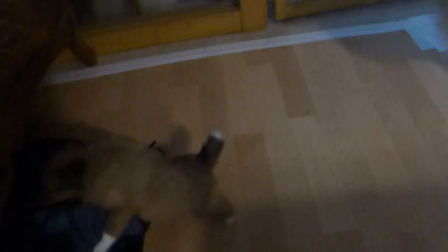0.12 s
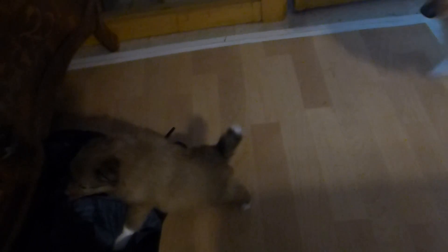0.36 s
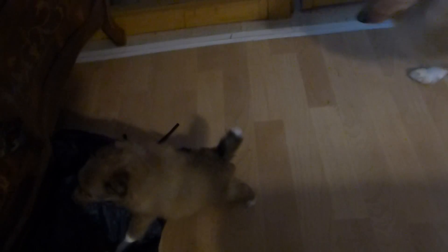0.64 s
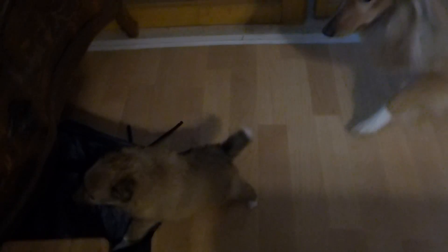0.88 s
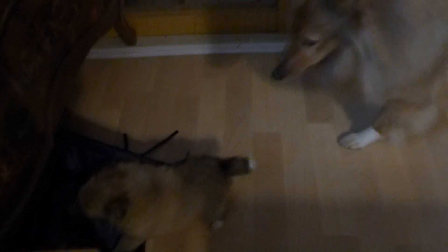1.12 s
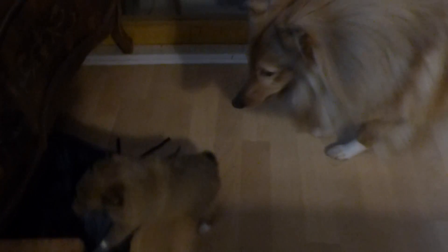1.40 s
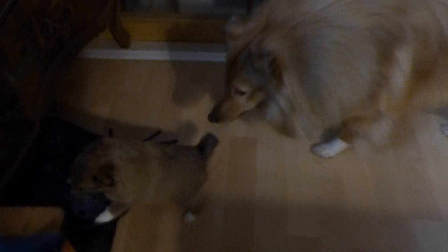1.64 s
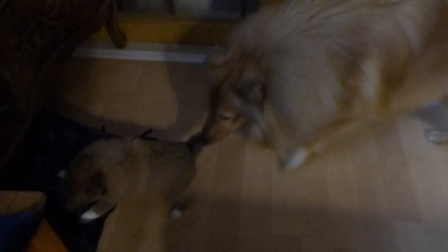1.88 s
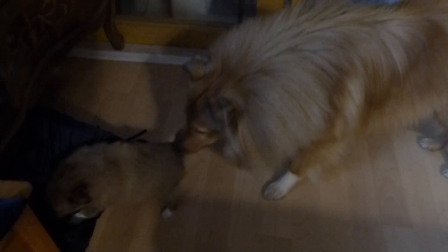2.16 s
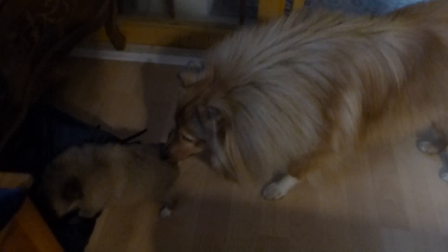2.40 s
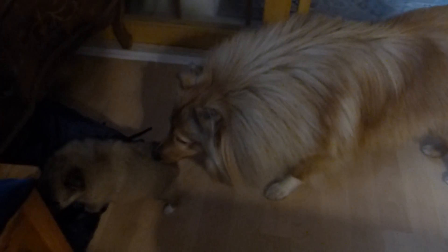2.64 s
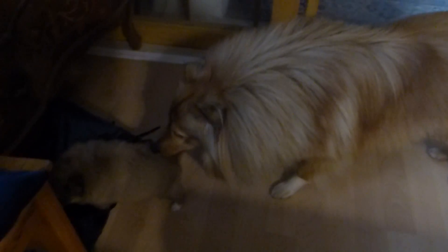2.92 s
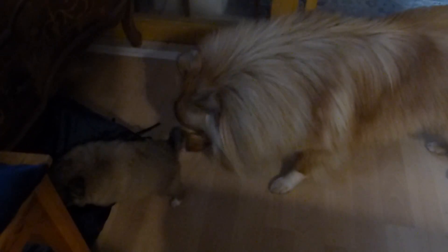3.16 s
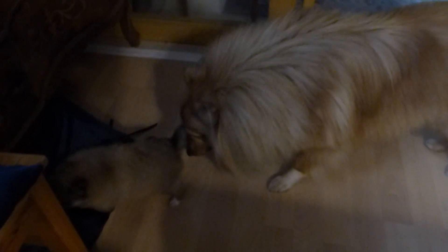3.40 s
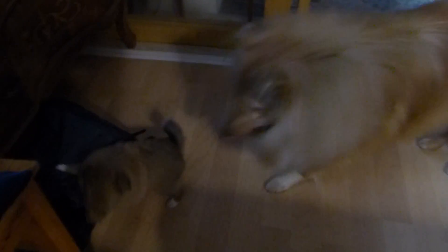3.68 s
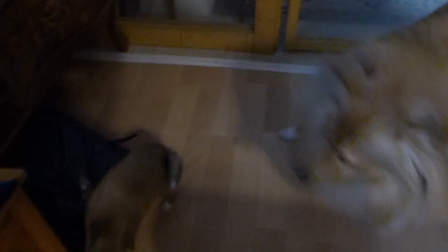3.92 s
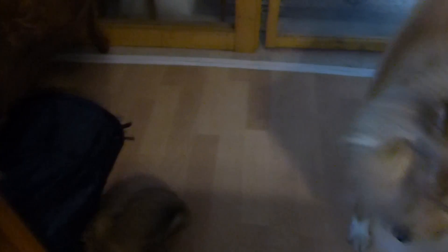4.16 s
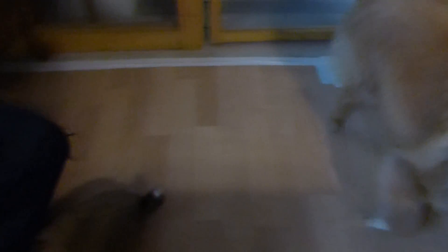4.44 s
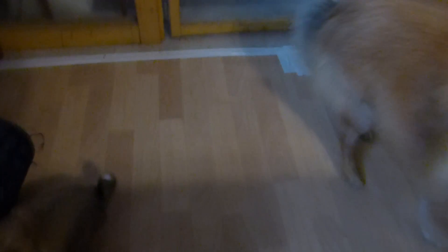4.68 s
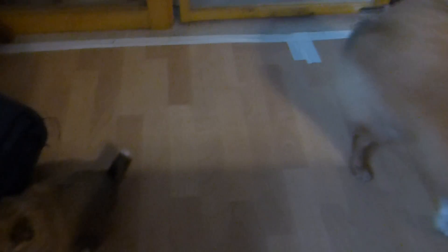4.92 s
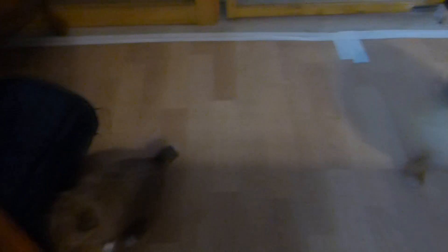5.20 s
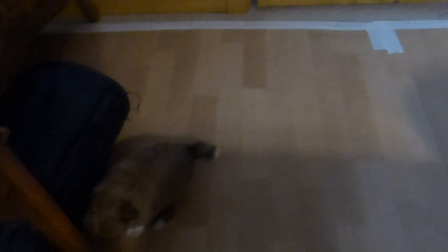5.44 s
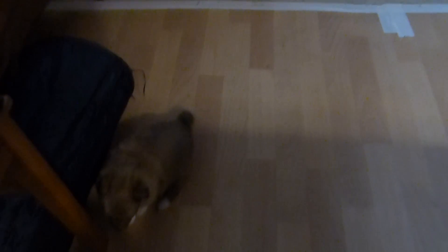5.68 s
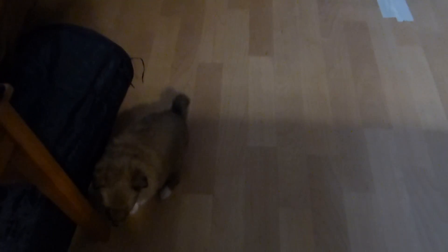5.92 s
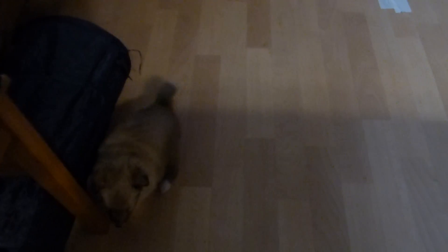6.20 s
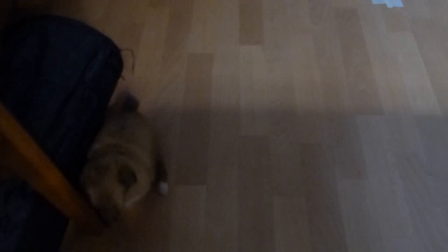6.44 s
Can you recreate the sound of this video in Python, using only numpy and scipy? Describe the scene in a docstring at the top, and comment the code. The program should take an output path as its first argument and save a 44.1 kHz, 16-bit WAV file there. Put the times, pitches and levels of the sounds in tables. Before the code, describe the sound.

A puppy and a grown dog move on a laminate floor in a furnished room, heard through a small stereo microphone over a quiet, steady low hum. It opens at once with a rustle and soft knocks; from 0 to 1.4 s claws tick irregularly, some dull, some bright, with short pad scuffs and grainy fur or cloth rubbing. From 1.5 to 3.4 s it is sparser: soft stirrings, low floor thuds at about 2.0 and 2.9, isolated clicks. At 3.45 movement builds, scuffs hiss near 3.85, and a scramble peaks around 4.1-4.25 with drumming boards and one very sharp, loud claw snap. By 4.4 it falls away. Light high ticks and small rustles follow. The puppy groans softly, low and husky, rising then sinking around 5.2-5.6, and again, shorter and falling, at 5.85-6.2. Faint ticks thin out; a crisp last scuff comes near 6.5.

```python
"""A puppy and a grown dog move about on a laminate floor in a furnished room, heard over a steady hum.
First claws tick as noise snaps with pitched tails, pads scuff as swelling noise bands, paws knock on the boards;
fur and cloth rustle as grainy noise and the floor modes drum below. Past the middle a scramble swells up.
Then the puppy gives two low groans, a wavering fundamental with husky throat resonances, among thinning ticks.
A last scuff ends it. A noise tail gives the room, and a small two-port microphone hears it all."""
import sys
import numpy as np
from scipy import signal
from scipy.io import wavfile

SR = 44100
rng = np.random.default_rng(int(sys.argv[2]) if len(sys.argv) > 2 else 0)


def volts_from_decibels(level):
    """Turn decibel levels (scalar or array-like) into linear amplitude factors."""
    exponent = np.asarray(level, float) / 20
    return 10 ** exponent


def to_wav(sig):
    """Store sig (one row per channel, or 1-D mono) as 16-bit WAV at the path in sys.argv[1].

    Samples outside -1..1 are clipped; the rate is SR.
    """
    pcm = np.clip(np.atleast_2d(sig), -1, 1) * 32767
    pcm = np.round(pcm).astype(np.int16)
    wavfile.write(sys.argv[1], SR, pcm.T)  # frames by channels


N = 289781  # length in samples


def rms_one(x):
    """Scale to unit rms."""
    return x / np.sqrt(np.mean(x ** 2) + 1e-20)


def peak_one(x):
    """Scale to unit peak."""
    return x / np.abs(x).max()


def in_time(rows):
    """Turn the columns after start_s into curves, one value a sample."""
    start_s, *columns = np.transpose(rows)
    return [np.interp(np.arange(N) / SR, start_s, column) for column in columns]


def at_hz(points, hz):
    """Read a spectrum on a log-frequency axis."""
    points_hz, values = np.array(points).T[:2]
    return np.interp(np.log(hz), np.log(points_hz), values)


def drift(rate_hz):
    """Random wavering with unit rms: noise through two equal low-pass poles at rate_hz."""
    step = 40  # samples between computed values
    r = np.exp(-2 * np.pi * rate_hz * step / SR)
    slow = signal.lfilter([1], [1, -2 * r, r * r], rng.standard_normal(N // step + 2002))
    slow = rms_one(slow[2000:])  # the filter has settled by then
    return np.interp(np.arange(N) / step, np.arange(len(slow)), slow)


def resonate(x, hz, width_hz):
    """Two-pole resonance with gain 1 on top."""
    r = np.exp(-np.pi * width_hz / SR)
    zeros = np.array([1, 0, -1]) * (1 - r * r) / 2
    return signal.lfilter(zeros, [1, -2 * r * np.cos(2 * np.pi * hz / SR), r * r], x)


def filtered(x, order, hz, kind):
    """Butterworth filter."""
    return signal.sosfilt(signal.butter(order, hz, kind, fs=SR, output="sos"), x)


def banded(spectrum, grain_db, patchy_db, tilt_db=0, apart=1.0):
    """Third-octave bands of grainy stereo noise, each with its own level, flicker and left-right likeness."""
    # likeness of left and right, before apart scales the unlikeness: pitch_hz, likeness [0 to 1]
    likeness = [(60, 0.23), (150, 0.51), (380, 0.83), (950, 0.78), (2380, 0.67), (5980, 0.9),
                (15000, 0.817)]
    lowest_hz, highest_hz = spectrum[0][0], min(1.26 * spectrum[-1][0], 19000)
    edges = 2 ** np.arange(np.log2(lowest_hz), np.log2(highest_hz), 1 / 3)
    # single samples stand out of the noise, or sink into it where grain_db is negative
    grains = volts_from_decibels(grain_db * np.minimum(rng.exponential(1, N), 4.5))
    white = rng.standard_normal((2, 2, N)) * grains
    together = drift(45)  # flicker shared by all bands
    out = 0
    for k, (low, high) in enumerate(zip(edges, edges[1:])):
        mid, side = filtered(white[k % 2], 2, [low, high], "band")  # neighbours use different noise
        hz = np.sqrt(low * high)
        unlike = np.clip(apart * (1 - at_hz(likeness, hz)), 0, 1)
        flicker_db = patchy_db * (together + 1.59 * drift(27.4))
        gain = volts_from_decibels(at_hz(spectrum, hz) + flicker_db)
        slope = volts_from_decibels(tilt_db * np.log2(hz / 4000))  # tilt_db is per octave
        out = out + gain * slope * (np.sqrt(2 - unlike) * mid + np.sqrt(unlike) * side * [[1], [-1]])
    return rms_one(out)


def claws():
    """Each claw tick is a snap with a short rattling tail around its own pitch, and a broad edge."""
    # claw ticks: start_s, level_db [peak of the tick before narrow ring and edge], pitch_hz,
    # rattle_t60_s, edge_db [peak of the broad edge over level_db]
    claw_ticks = [(0.0747, -30, 2280, 0.27, 4), (0.2682, -32.5, 3220, 0.1, -20.5),
                  (0.2896, -30, 1425, 0.093, -22), (0.3533, -21, 3620, 0.081, -30),
                  (0.4218, -36, 2090, 0.08, 4), (0.4667, -32, 1646, 0.068, -14),
                  (0.5103, -24.5, 3014, 0.06, -15.5), (0.6675, -23.5, 2090, 0.074, -1.5),
                  (0.8226, -25.5, 5060, 0.03, 1), (0.989, -31.5, 2670, 0.055, -20),
                  (1.1522, -25, 4700, 0.034, -26.5), (1.2469, -26, 1773, 0.1, -30),
                  (1.3762, -22.5, 4500, 0.2, -30), (1.917, -26, 4600, 0.0216, -30),
                  (2.0245, -30, 1490, 0.028, 8), (2.1031, -33, 4270, 0.046, 11),
                  (2.683, -29, 1565, 0.092, 4), (2.977, -43, 4000, 0.041, -17.5),
                  (3.1099, -33, 5210, 0.08, -22), (3.1656, -30, 2470, 0.1, -12),
                  (3.7615, -25.5, 1660, 0.068, -19.5), (4.0814, -14.5, 1660, 0.043, -9),
                  (4.242, -5, 4660, 0.02, -30), (4.4229, -36, 5290, 0.103, -18),
                  (4.5364, -25.5, 4090, 0.088, -21), (4.6404, -37, 3800, 0.073, -20),
                  (4.6832, -22.5, 5730, 0.096, -31.5), (5.032, -41, 2820, 0.053, -13),
                  (5.0948, -25.5, 5800, 0.113, -25.5), (5.1248, -27, 7470, 0.069, -23.5),
                  (5.3673, -30, 4100, 0.08, -30), (5.5065, -30.5, 5940, 0.18, -23),
                  (5.889, -36.5, 5880, 0.092, -27.5), (5.99, -45.5, 3900, .04, -20),
                  (6.05, -44, 3500, .04, -20), (6.2233, -39, 6150, 0.11, -23), (6.29, -47, 3000, .04, -20),
                  (6.346, -44, 2900, 0.06, -20)]
    snap_t60_s, snap_gain = 0.005, 1.8  # first contact against the rattle
    raw_share = 0.55
    ring_db, ring_width_share = -12.5, 0.051  # narrow ring of the claw, its width over its pitch
    out, t = np.zeros(N + SR), np.arange(SR // 4) / SR
    for start_s, level_db, pitch_hz, t60_s, edge_db in claw_ticks:
        noise = rng.standard_normal(len(t))
        snap = np.sign(noise) * volts_from_decibels(-60 * t / snap_t60_s)
        rattle = noise * (0.52 * volts_from_decibels(-60 * t / 0.082) + 0.8 * volts_from_decibels(-60 * t / max(t60_s, 0.01)))
        burst = snap_gain * snap + rattle
        # raw part: steep below the pitch, gentle above
        raw = filtered(burst, 2, 0.7 * pitch_hz, "high")
        raw = filtered(raw, 1, 1.2 * pitch_hz, "low")
        body = burst
        for _ in range(2):
            body = resonate(body, pitch_hz, 0.96 * pitch_hz)
        ring = resonate(burst, pitch_hz, ring_width_share * pitch_hz)
        edge = filtered(burst, 1, [1800, 14000], "band")
        tick = peak_one(peak_one(body) + raw_share * peak_one(raw))
        tick = tick + volts_from_decibels(ring_db) * peak_one(ring) + volts_from_decibels(edge_db) * peak_one(edge)
        at = round(start_s * SR)
        out[at:at + len(t)] += volts_from_decibels(level_db) * tick
    return out[:N]


def scuffs():
    """A pad slides (high) or lands (low), and a few further claw ticks sound as very brief bursts: gritty noise
    around one broad pitch that swells and fades."""
    # scuffs, and further claw ticks at 1.424 s and 5.383 s: top_s, level_db [rms of the noise before its
    # swell], pitch_hz, fade_s [to 1/e]
    swelling_bands = [(.29, -44, 170, .015), (.353, -30.5, 3370, 0.0069), (.92, -37.5, 6170, 0.014),
                      (1.285, -40.5, 8700, .0073), (1.29, -47.5, 152, .026), (1.342, -33, 5700, .012),
                      (1.424, -40, 5330, 0.0027), (1.55, -47, 170, 0.0294), (1.72, -42.5, 3870, .017),
                      (2.485, -44.5, 189, .016), (2.53, -56, 89, 0.07), (2.771, -41, 3960, 0.012),
                      (2.845, -46.5, 196.6, .038), (3.31, -44.5, 5300, 0.0094), (3.44, -39, 229, .06),
                      (3.58, -40.5, 250, .08), (3.849, -20.5, 5140, 0.0061), (3.94, -22, 4400, 0.0095),
                      (4.14, -38, 160, 0.048), (4.16, -26, 1000, 0.042), (4.52, -40, 4360, 0.0225),
                      (4.58, -42, 5500, 0.0245), (4.86, -48, 6000, 0.014), (5.383, -41, 4870, 0.0026),
                      (6.10, -53.5, 5000, .02), (6.477, -27.5, 5970, 0.01974)]
    rise_share = 0.5  # spread of the bell-shaped rise over fade_s
    t, out = np.arange(-SR // 4, SR // 2) / SR, np.zeros(N + SR)
    grit = rng.standard_normal(N + SR) * volts_from_decibels(np.resize(drift(350), N + SR))
    for top_s, level_db, pitch_hz, fade_s in swelling_bands:
        span = slice(round(top_s * SR), round(top_s * SR) + len(t))
        rise = np.exp(-0.5 * (t / (rise_share * fade_s)) ** 2)
        swell = np.where(t < 0, rise, np.exp(-np.abs(t) / fade_s))
        band = filtered(grit[span], 2, [0.8 * pitch_hz, min(1.64 * pitch_hz, 16000)], "band")
        out[span] += volts_from_decibels(level_db) * swell * rms_one(band)
    return out[SR // 4:SR // 4 + N]  # t begins a quarter second ahead of each top


def boards(x):
    """The modes of the floor ring in parallel, with alternating sign."""
    # floor modes: pitch_hz, width_hz, gain_db
    floor_modes = [(239, 55, -4.5), (457.3, 31, 5.5), (648, 95, 3), (741, 11.3, -2), (1094, 100, -7.5),
                   (1337, 27, -2.5), (1660, 50, -28)]
    return sum((-1) ** k * volts_from_decibels(gain_db) * resonate(x, pitch_hz, width_hz)
               for k, (pitch_hz, width_hz, gain_db) in enumerate(floor_modes))


def knocks():
    """A paw knocks on the floor: a short noise blow into the modes of the boards."""
    # paw knocks: start_s, level_db [peak]
    paw_knocks = [(.0173, -24.5), (.0739, -28), (.2888, -22.5), (.4218, -33), (.4667, -30), (.989, -31),
                  (1.2466, -31), (1.3763, -36), (2.0245, -24.5), (2.8689, -33.5), (3.1103, -35.5),
                  (3.7618, -27.5), (4.2418, -25), (4.43, -34), (5.3672, -32)]
    out, t = np.zeros(N + SR), np.arange(SR // 8) / SR
    for start_s, level_db in paw_knocks:
        blow = rng.standard_normal(len(t)) * volts_from_decibels(-60 * t / 0.006)  # t60 of 6 ms
        at = round(start_s * SR)
        out[at:at + len(t)] += volts_from_decibels(level_db) * peak_one(boards(blow))
    return out[:N]


def groans():
    """A soft voice behind a nearly shut mouth: a clean fundamental, and husky pulses that ring the throat."""
    # one list a groan: start_s, pitch_hz [before its wavering], level_db [rms of the fundamental before its throb]
    groan_curves = [
        [(4.75, 200, -64), (4.95, 222, -59), (5.17, 200, -60), (5.26, 218, -51), (5.38, 250, -46),
         (5.45, 246, -44), (5.5, 226, -50), (5.62, 193, -63)],
        [(5.81, 180, -64), (5.84, 200, -55), (5.86, 245, -43), (5.98, 232, -49), (6.09, 200, -56),
         (6.25, 175, -58), (6.29, 170, -68)],
    ]
    # throat resonances: pitch_hz, width_hz [of each of two passes], level_db [against each other]
    throat_modes = [(180, 50, -11), (265, 70, -11), (445, 60, -11), (685, 90, -9), (905, 70, -16),
                    (1480, 140, -19)]
    husk, octave_db = 3.0, -16  # breath noise in the pulses; second partial over the fundamental
    # the throat takes a larger share as the voice sinks under its easy level
    open_db, open_per_db, easy_db = 1, -0.4, -50
    out, t = 0, np.arange(N) / SR
    for rows in groan_curves:
        pitch_hz, level_db = in_time(rows)
        phase = 2 * np.pi * np.cumsum(pitch_hz * (1 + 0.06 * drift(50))) / SR
        # breath noise comes with each puff
        puffs = np.exp(12.0 * (np.cos(phase) - 1)) * (1 + husk * rng.standard_normal(N))
        throat = 0
        for k, (mode_hz, width_hz, mode_db) in enumerate(throat_modes):
            ringing = resonate(resonate(puffs, mode_hz, width_hz), mode_hz, width_hz)
            throat = throat + (-1) ** k * volts_from_decibels(mode_db) * rms_one(ringing)
        throat = throat * volts_from_decibels(open_db + open_per_db * (level_db - easy_db))
        throb = volts_from_decibels(3.5 * drift(30))
        tone = np.sqrt(2) * throb * (np.sin(phase) + volts_from_decibels(octave_db) * np.sin(2 * phase))
        gate = np.clip(np.minimum(t - rows[0][0], rows[-1][0] - t) / 0.025, 0, 1)  # 25 ms ramps
        out = out + volts_from_decibels(level_db) * gate * (tone + throat)
    return out


def swells():
    """Steady stirring plus one swell per shift of weight, added in power: rustle, brightness, drumming."""
    # steady stirring: start_s, rustle_db, brightness_db [per octave], drumming_db
    stirring = [(0, -45, 1, -48), (.2, -50.5, -2.5, -50), (.5, -45.5, -1.5, -45), (.9, -40, -.5, -45.5),
                (1.3, -44.5, -2, -47.5), (1.5, -47.5, -1.5, -46.5), (1.8, -55, -1, -52.5),
                (2.3, -49.5, -1.5, -51), (2.9, -53, 0.5, -57), (3.37, -50.5, -2, -53),
                (3.46, -38, -0.5, -40.5), (3.65, -35.5, -0.5, -35.5), (3.76, -38, -0.5, -40.5),
                (3.82, -42.5, -0.5, -43), (3.9, -35, 0, -38), (4.03, -32, 1.5, -37), (4.27, -34, 0, -35.5),
                (4.39, -58, 1.5, -59.5), (4.6, -53, 2.5, -56), (5.06, -60.5, 0.5, -53),
                (5.7, -58, -1.5, -57.5), (6.1, -62.5, 1, -50), (6.38, -72, 1.5, -64),
                (6.57, -58, 6.5, -54.5)]
    # shifts of weight: top_s, rustle_db, drumming_db, fade_s [to fall by 10 dB]
    weight_shifts = [(0.0, -31.5, -38.5, 0.0887), (.085, -37, -44, .045), (.3, -39, -41, .09),
                     (.41, -42, -44, .06), (.54, -42.5, -47, 0.04), (.7, -40.5, -49.5, 0.25),
                     (.9, -40, -47.5, 0.18), (1.05, -46.5, -50.5, 0.15), (1.36, -41, -44, 0.13),
                     (1.629, -41, -54, .1), (1.72, -46, -50.5, .05), (1.87, -46, -50, .08),
                     (1.98, -47, -49, .12), (2.11, -41.5, -45, 0.0626), (2.35, -44.5, -48.5, 0.15),
                     (2.48, -46, -48, 0.07), (2.779, -42.5, -46, .1), (2.87, -48, -49, .05),
                     (3.03, -47, -45.5, .1), (3.289, -41.5, -44.5, 0.06), (3.43, -41, -40, 0.02),
                     (3.739, -33, -42.5, 0.0643), (3.858, -26.5, -34, 0.0469), (4.11, -23.5, -29.5, 0.0535),
                     (4.158, -20, -24.5, 0.0643), (4.435, -45, -44, 0), (4.77, -46.5, -47, 0.21),
                     (4.87, -53.5, -61, 0.02), (5.131, -42.5, -51, 0.06), (5.39, -52, -44, 0.08),
                     (5.511, -47.5, -53, .07), (5.9, -51.5, -57, 0.0337), (6.49, -57, -66.5, .15)]
    rise_share, roundness = 0.6, 1.12  # rise time over fade time; 1 = pointed top, 2 = bell
    t = np.arange(0, N, 32) / SR
    rustle_db, bright_db, drum_db = in_time(stirring)
    power = 1e-12
    for top_s, fur_db, floor_db, fade_s in weight_shifts:
        away = np.where(t < top_s, (top_s - t) / rise_share, t - top_s) / fade_s
        power = power + volts_from_decibels(2 * np.array([[fur_db], [floor_db]])) * 10 ** -away ** roundness
    fur, floor = (np.interp(np.arange(N) / SR, t, p) for p in power)
    return np.sqrt(fur + volts_from_decibels(2 * rustle_db)), bright_db, np.sqrt(floor + volts_from_decibels(2 * drum_db))


def rustle(fur, bright_db):
    """Fur and cloth rub: grainy noise that follows the movement in level and brightness."""
    # rustle spectrum before the brightness tilt: pitch_hz, level_db [per Hz, relative]
    rustle_spectrum = [(530, -5.5), (900, -5.5), (3430, -8), (5100, -8.5), (8150, -9), (9200, -10),
                       (13400, -17.5), (16000, -24)]
    return fur * banded(rustle_spectrum, grain_db=3.5, patchy_db=0.6, tilt_db=bright_db, apart=0.6)


def drumming(weight):
    """The weight of the dogs rings the floor: low grainy noise, plain and through the modes of the boards."""
    # tread spectrum before the floor modes: pitch_hz, level_db [per Hz, relative]
    tread_spectrum = [(35, -68), (60, -43), (145, -4), (459, 1), (529, -3.5), (628, -3), (789, -7.5),
                      (1800, -13.5), (2340, -36), (3960, -120)]
    tread = banded(tread_spectrum, grain_db=3.0, patchy_db=1.7469, apart=0.074)
    return weight * rms_one(tread + 1.2 * boards(tread))


def room(x):
    """Echo of the furnished room: a dull noise tail for each side, dying by the room's t60."""
    t60_s, echo_db, wall_cut_hz = 0.34, -12, 7200
    t = np.arange(SR // 2) / SR
    dull = np.exp(-2 * np.pi * wall_cut_hz / SR)
    tail = signal.lfilter([1], [1, -dull], rng.standard_normal((2, len(t))))
    tail = tail * volts_from_decibels(-60 * t / t60_s) * (t > 0.004)  # silent for the first 4 ms
    tail = tail + 0.35 * tail[::-1]  # the two ports are close together
    tail = tail / np.sqrt(np.sum(tail ** 2) / 2)
    return volts_from_decibels(echo_db) * signal.fftconvolve(x, tail, axes=1)[:, :N]


def room_hum():
    """The hum of the room: steady banded noise with a slight flicker, wide between the sides."""
    # hum spectrum: pitch_hz, level_db [per Hz, relative]
    hum_spectrum = [(18, -58), (30, -8.5), (103, -34), (194, -4.5), (273, -20.5), (404, -10), (499, -17),
                    (666, -5.5), (2120, -24), (4420, -26), (9970, -28.5), (14800, -35.5), (16000, -40)]
    return volts_from_decibels(-49.5) * banded(hum_spectrum, grain_db=-0.9, patchy_db=2.0, apart=4.7)


def scene():
    """Dogs and floor, the echo of paws and voice in the room, and the hum."""
    paws = claws() + scuffs() + knocks()
    voice = groans()
    fur, bright_db, weight = swells()
    echo = room((paws + 0.6 * voice)[None])
    return paws + voice + echo + rustle(fur, bright_db) + drumming(weight) + room_hum()


def roll_off(x):
    """The treble ends steeply here."""
    return signal.sosfilt(signal.butter(12, 16460, fs=SR, output="sos"), x)


def record(dry):
    """The housing dips a narrow treble band; close ports hear the bass alike; left is louder, both ends are cut."""
    notch_hz, notch_width_hz, notch_share = 9100, 600, 0.7
    left_db, ports_hz, bass_cut_hz, treble_cut_hz = 0.42, 504, 85, 15800
    heard = dry - notch_share * resonate(dry, notch_hz, notch_width_hz)
    heard = filtered(heard, 2, bass_cut_hz, "high")
    heard = heard * volts_from_decibels(np.array([[left_db], [-left_db]]))  # left up, right down as much
    mid, side = heard.mean(axis=0), (heard[0] - heard[1]) / 2
    side = filtered(side, 2, ports_hz, "high")
    heard = mid + side * [[1], [-1]]
    steep_cut = signal.ellip(10, 0.5, 60, treble_cut_hz, fs=SR, output="sos")
    heard = signal.sosfilt(steep_cut, heard)
    return roll_off(heard)


dry = scene()
out = record(dry)
to_wav(out)
```